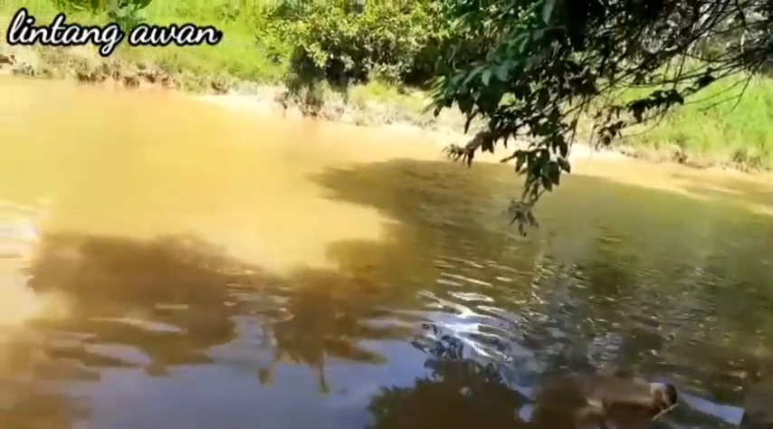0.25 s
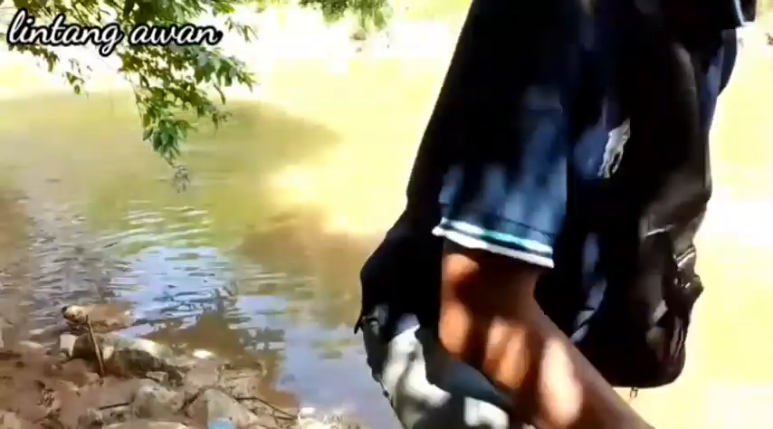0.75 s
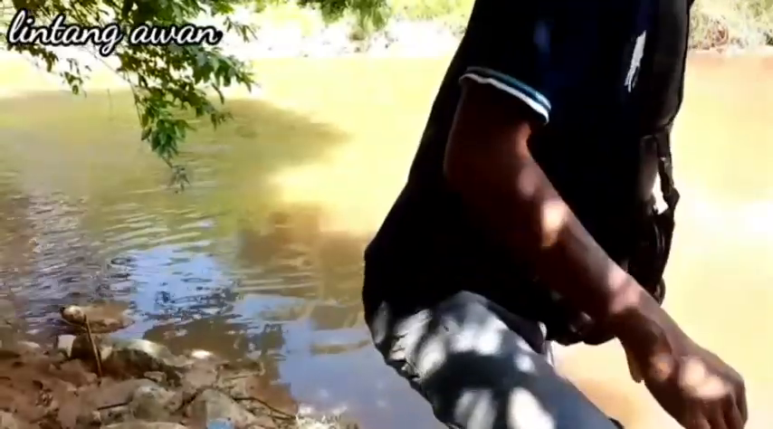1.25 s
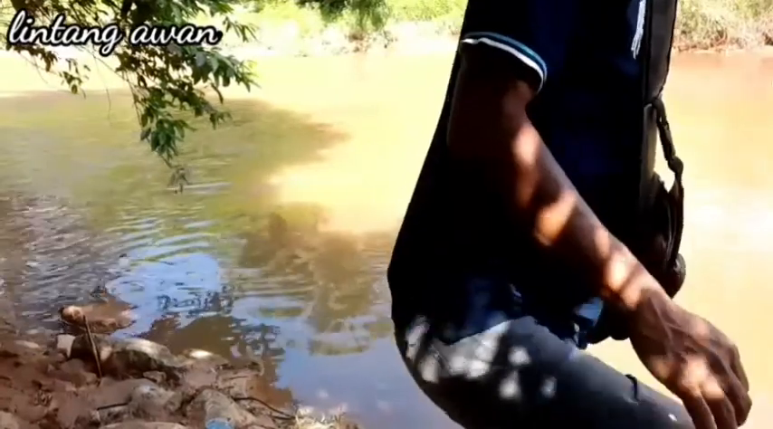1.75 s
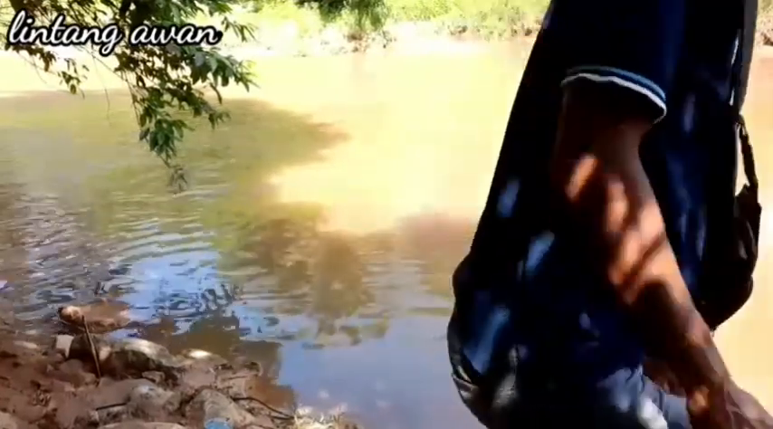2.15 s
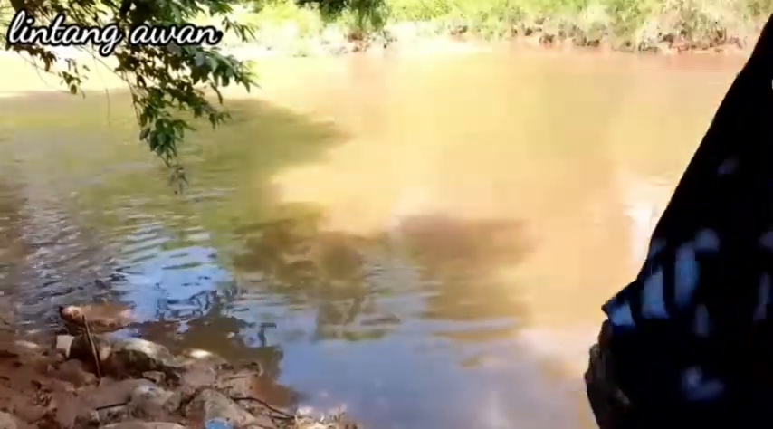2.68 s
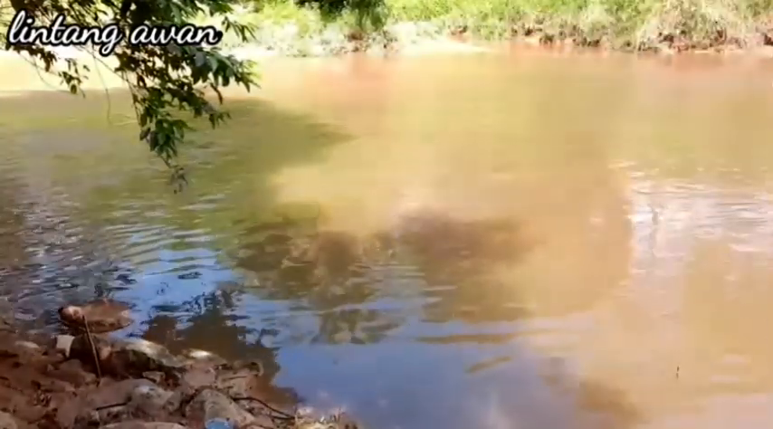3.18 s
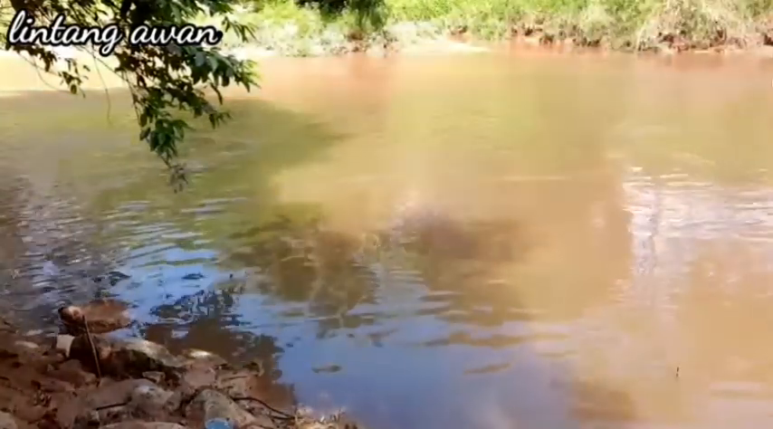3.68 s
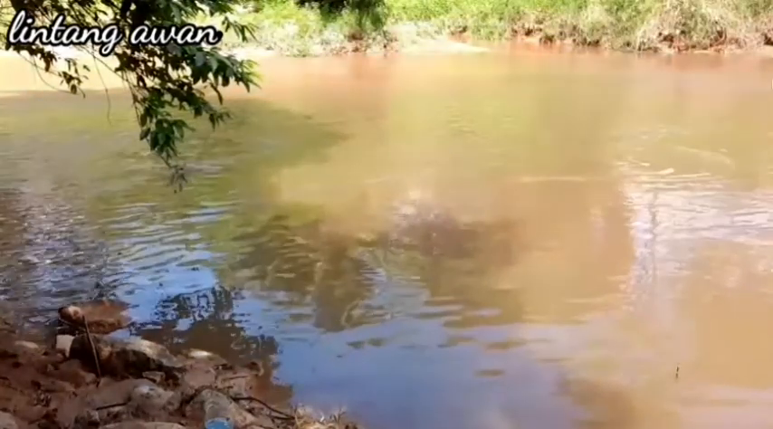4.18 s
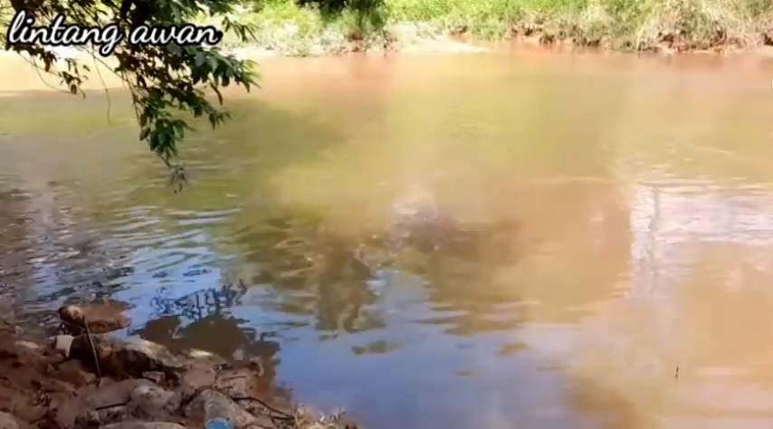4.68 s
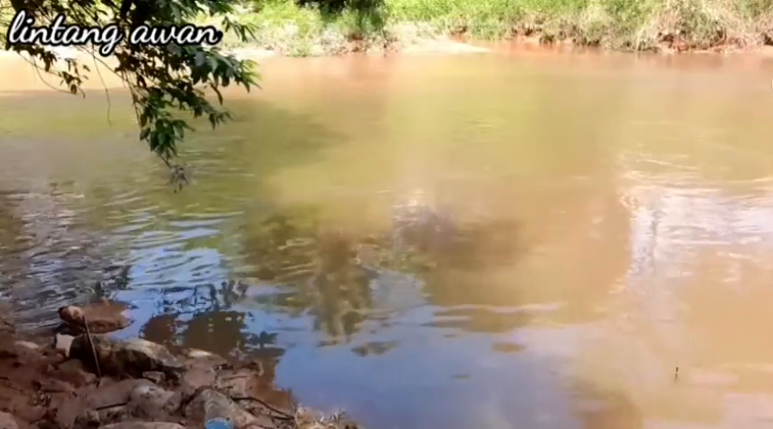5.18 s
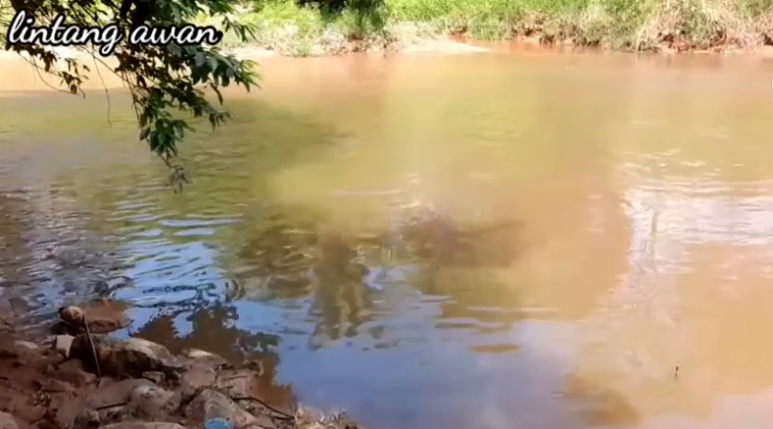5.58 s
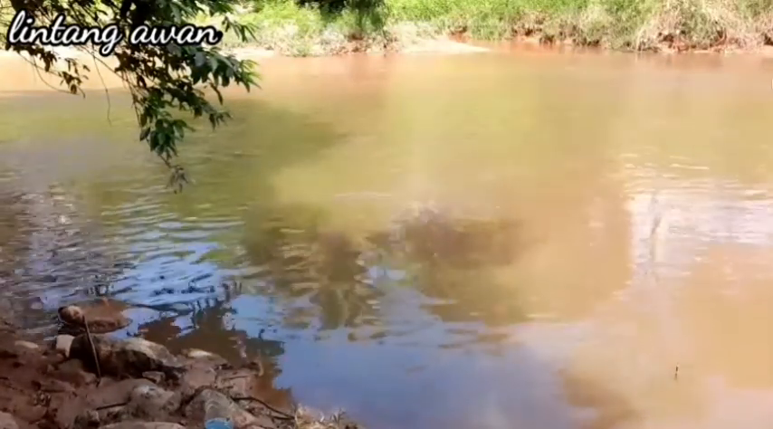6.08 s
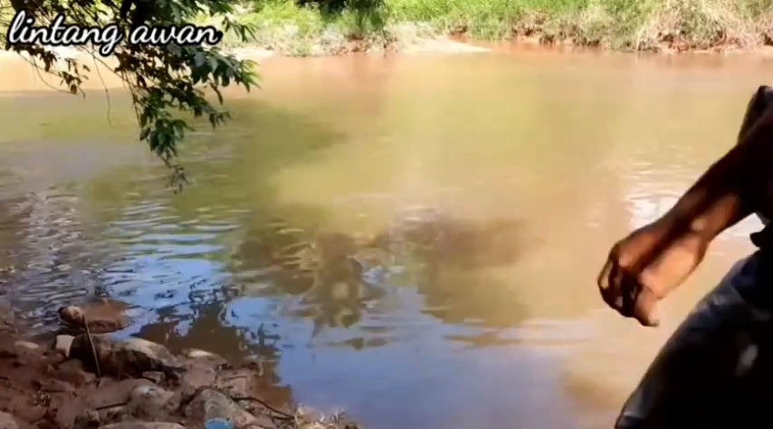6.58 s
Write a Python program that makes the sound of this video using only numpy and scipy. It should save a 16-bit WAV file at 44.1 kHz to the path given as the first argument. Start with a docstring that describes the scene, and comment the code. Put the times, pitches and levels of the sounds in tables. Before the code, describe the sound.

Complete silence until about 0.55 s, when a riverbank ambience opens at once. Very high crickets, near 9 kHz, chirp four to five times a second to the end, slipping in and out of step; the second swells around 2.5-3 s, drops back, then returns from about 4.8 s. Beneath lie a flickering far insect whine, soft low river rush, airy wash, hollow drone and faint hum. Close clothing swishes from 1 to 1.8 s. At 1.9 s a bird slurs steeply downward, then at 2.06 s stones knock dully with a grit crunch and low microphone bump. From 2.6 to 5.9 s a distant hoarse bird gives soft sliding calls, blurred by trees. Lighter knocks and crunches come at 3.3 and 5 s, with scattered rustles. A low buffet comes at 6.1 s, a knock at 6.35 s; falling bird notes at 6, 6.3 and 6.65 s lead to a last slur at 6.8 s.

```python
"""After a moment of silence a shaded river bank opens: three crickets chirp near 9 kHz, drifting in and out of
step, over far insects (flickering noise), a soft river and a low drone and hum. A man shifts about by the
microphone: his clothes rustle from the first second, then stones knock (dying rings) and grit crunches (lumpy noise).
Near two seconds a bird gives a falling slur, a sliding tone; from 2.6 s a far bird calls, blurred by trees.
Near the end the first bird gives short falling notes and one more slur."""
import sys
import numpy as np
from scipy import signal
from scipy.fft import rfft, irfft, next_fast_len
from scipy.io import wavfile
from scipy.ndimage import uniform_filter1d

SR = 44100
rng = np.random.default_rng(int(sys.argv[2]) if len(sys.argv) > 2 else 0)


def wav_record(signal):
    """Record a signal, one row per channel, as 16-bit PCM in the file named by sys.argv[1]."""
    frames = np.transpose(np.atleast_2d(signal))
    bounded = np.clip(frames, -1, 1)
    # unit amplitude maps onto the largest positive 16-bit level
    quanta = np.round(bounded * 32767).astype(np.int16)
    wavfile.write(sys.argv[1], SR, quanta)


N = 301776  # length in samples


def cricket(chirps, wing_hz, rise_hz, stroke_hz, swell_s, fade_s,
            soft=.15, stroke_s=.0135, sag_hz=110, scatter_hz=22, uneven_db=.9):
    """Each wing stroke rings a short tone; a chirp's soft strokes swell and climb in pitch, then stop short."""
    out = np.zeros(N)
    u = np.linspace(0, 1, round(stroke_s * SR))
    shape = np.sin(np.pi * u ** .65) ** 2
    for s, db in chirps:
        for k in np.arange(-9, 6):  # stroke 0 is the loudest
            slip, detune, force = rng.standard_normal(3)
            ahead = k / stroke_hz + 0.001 * slip
            if k < 0:
                swell = soft + (1 - soft) * np.exp(-(ahead / swell_s) ** 2)
            else:
                swell = np.exp(-(ahead / fade_s) ** 6)
            # the wing slows as it closes, so each tone sags
            hz = wing_hz + rise_hz * (swell - 1) + scatter_hz * detune - sag_hz * (u - .5)
            tone = np.sin(2 * np.pi * (np.cumsum(hz) / SR + rng.random()))
            size = 2 * amp(db + uneven_db * force) * swell * shape
            add(out, s + ahead - stroke_s / 2, size * tone)
    return out


def song(first_s, tempo, effort):
    """One chirp follows another at a drifting tempo; gives rows of loudest_s, level_db."""
    s, chirps = first_s, []
    while s < N / SR:
        chirps.append((s, np.interp(s, *np.transpose(effort))))
        s += np.interp(s, *np.transpose(tempo))
    return chirps


# when each cricket's first chirp is loudest
NEAR_FIRST_S, SECOND_FIRST_S, FAR_FIRST_S = .599, .722, .765
# the far cricket keeps an even beat and strength (level before the trees)
FAR_PERIOD_S, FAR_CRICKET_DB = .211, -53.5
# the nearer cricket's tempo: time_s, chirp_gap_s
NEAR_TEMPO = [(.6, .229), (1.05, .218), (1.6, .227), (2.3, .222), (3.4, .2375), (4.2, .228), (5.1, .228),
              (5.6, .24), (6.1, .218)]
# the second cricket's quicker tempo: time_s, chirp_gap_s
SECOND_TEMPO = [(.7, .2232), (1.4, .2079), (2.9, .204), (3.4, .2268), (4.1, .2028), (5.1, .1992),
                (6.3, .2074)]
# the nearer cricket sings evenly: time_s, level_db (before mixing)
NEAR_EFFORT = [(.6, -41.8), (2.6, -42), (3.7, -41.6), (4.7, -41.3), (5.8, -42), (6.4, -41.8)]
# the second swells twice with a lull between: time_s, level_db (before mixing)
SECOND_EFFORT = [(.7, -50), (1.3, -51), (2.1, -43.5), (2.6, -41), (3.05, -40.5), (3.3, -58), (4.1, -52),
                 (4.8, -42), (5.5, -39.8), (6.8, -40.5)]
# how the rasp of the wing's file spreads over pitch: pitch_hz, relative_level_db (per Hz)
RASP_SPECTRUM = [(7000, -25), (7800, -8), (8200, 4.5), (8600, 10.5), (8850, 10), (9100, 8), (9500, -7),
                 (10200, -27), (12000, -50)]


def crickets():
    """Three singers in the foliage, each at its own tempo; rasping noise follows the nearer two's strokes."""
    near = cricket(song(NEAR_FIRST_S, NEAR_TEMPO, NEAR_EFFORT),
                   wing_hz=8975, rise_hz=90, stroke_hz=66.5, swell_s=.06, fade_s=.046)
    second = cricket(song(SECOND_FIRST_S, SECOND_TEMPO, SECOND_EFFORT),
                     wing_hz=9050, rise_hz=120, stroke_hz=68.5, swell_s=.066, fade_s=.045)
    far_chirps = [(s, FAR_CRICKET_DB) for s in np.arange(FAR_FIRST_S, N / SR, FAR_PERIOD_S)]
    far = cricket(far_chirps, wing_hz=8650, rise_hz=50, stroke_hz=64, swell_s=.06, fade_s=.045)
    direct = amp(-.7) * place(near, left_db=10.5, lead_s=.000258)
    direct = direct + amp(-1.5) * place(second, left_db=-5, lead_s=.00012)
    # the outline of the two songs opens and closes the rasp
    scrape = np.hypot(abs(signal.hilbert(near)), 0.85 * abs(signal.hilbert(second)))
    scrape = uniform_filter1d(scrape, size=280)
    rasp = amp(-11) * scrape * diffuse(RASP_SPECTRUM, patchy_db=.5, left_db=0)
    scattered = trees(amp(-11) * (near + second) + far, t60=.16, gap_s=.002)
    return direct + rasp + scattered


# rubs of clothing: peak_s, length_s, crisp_swish_db, soft_brush_db (relative levels)
RUBS = [(1.098, 0.21, -51, -55), (1.425, 0.051, -53, -62), (1.525, 0.17, -46.3, -55.5),
        (1.71, 0.23, -49, -58.5), (2.073, 0.11, -54, -55), (3.283, 0.18, -58, -59.5),
        (3.375, 0.12, -51.5, -53.5), (3.93, 0.35, -56, -64.5), (4.242, 0.066, -50, -53),
        (4.3, 0.094, -58, -59), (4.976, 0.25, -55, -59), (5.294, 0.11, -57, -60), (5.638, 0.15, -57, -63),
        (5.8, 0.27, -71, -56), (6.075, 0.22, -64, -59), (6.434, 0.19, -58, -53.5), (6.58, 0.16, -53, -78),
        (6.717, 0.39, -59, -59.5)]
RUB_RISE = 0.59  # share of a rub spent swelling
SNAGS_PER_S, SNAG_S = 320, .0005  # average number of fibre snags, and how fast each dies away


def clothes():
    """Fibres catch and slip: a grainy swish swells and fades over a softer brushing and a gritty crackle."""
    s, length, swish_db, brush_db = np.transpose(RUBS)
    grain = amp(1.6 * wander(350) + .9 * wander(60))
    swish = diffuse([(1500, 6.5), (3500, -3), (6000, 3), (7500, 4.5), (10000, 3.0), (12500, 6.5), (15500, 2.0)],
                    patchy_db=3.7, left_db=-1.5)
    brush = diffuse([(100, -46), (400, 12.5), (1000, -1.5), (2000, 0.5), (4000, 2.5), (6000, -27.0),
                     (10000, -33)], patchy_db=1.5, left_db=-1.0)
    # snags at chance moments, each a sudden burst that dies away
    snags = (rng.random(N) < SNAGS_PER_S / SR) * rng.uniform(.2, 1, N) ** 2
    bursts = evened(signal.lfilter([1], [1, -np.exp(-1 / (SNAG_S * SR))], snags))
    grit = diffuse([(1000, -20), (2500, 0), (4200, 0), (6500, -3), (11000, -18)], patchy_db=2, left_db=-2.5)
    crackle = amp(-7) * bursts * grit
    crisp = swells(zip(s, length, swish_db), RUB_RISE) * grain * swish
    soft = swells(zip(s, length, brush_db), RUB_RISE) * (grain * brush + crackle)
    return crisp + soft


# stones knocking underfoot: start_s, peak_db (before placing), pitch_factor, ring_time_factor
KNOCKS = [(2.0557, -30, 1.22, 1.1), (2.0572, -36, 3.9, 1.1), (2.0637, -23, 0.743, 0.92),
          (2.0692, -22.5, 0.73, 1.5), (2.0714, -26, 1.71, 0.7), (2.086, -47, .3, 2.2), (3.233, -40, 0.9, 1),
          (3.279, -34, 1.14, 1.2), (3.316, -38, 1.14, 1), (5.06, -39, 1.45, 1.2),
          (6.3393, -27.5, 1.18, 0.7), (6.357, -37, 1.45, .9)]
# a stone's ring, damped by mud, before those factors: pitch_hz, relative_level_db, time_to_fall_60_db_s
STONE_RING = [(302, -33, 0.018), (420, 13, 0.02), (579, 2.5, 0.013), (1170, -9, 0.018)]
CONTACT_S = 0.0011  # how quickly a knock builds


def stones():
    """Short dull knocks of stones bedded in mud: a few tones that start together and die fast."""
    out, t = np.zeros(N), np.arange(SR // 10) / SR
    for s, db, higher, longer in KNOCKS:
        ring = sum(amp(level - 60 * t / (t60 * longer)) * np.sin(2 * np.pi * hz * higher * t)
                   for hz, level, t60 in STONE_RING)
        ring = ring * (1 - np.exp(-t / CONTACT_S))
        add(out, s, amp(db) * ring / abs(ring).max())
    return place(out, left_db=-4.5, lead_s=.0001) + amp(-14.5) * trees(out, t60=0.084, gap_s=0.004)


# shoes pressing into damp grit: peak_s, length_s, level_db (before placing)
STEPS = [(2.067, .02, -43), (3.235, .04, -54), (3.29, .1, -50.5), (4.92, .11, -51.5), (5.06, .06, -54),
         (6.35, .04, -50.5)]
STEP_RISE = 0.49  # share of a step spent pressing down


def steps():
    """Damp grit gives way under a shoe in a low, lumpy crunch of noise."""
    lumps = evened(amp(2.5 * wander(130)))
    grit = diffuse([(150, -20), (330, -3), (480, 0), (750, -5), (1150, -6.5), (1600, -18), (4000, -34)],
                   patchy_db=2, left_db=0)[0]
    return swells(STEPS, STEP_RISE) * lumps * place(evened(grit), left_db=-3, lead_s=.0001)


FLUTTER = .019  # typical quick waver of the bird's pitch, as a share of the pitch


def whistle(contour, notes):
    """Notes hang at the top, then slide down; quick flutter in pitch and strength makes them breathy."""
    out = np.zeros(N)
    at, pitch, level = np.transpose(contour)
    flutter = 1 + FLUTTER * wander(500)
    for s, db, higher, longer, hold, change_db in notes:
        # the hold delays the slide, but not the first rise in level
        knots = at * longer + hold * (np.arange(len(at)) > 1)
        t = np.arange(0, knots[-1], 1 / SR)
        hz = higher * np.interp(t, at * longer + hold, pitch)
        hz = hz * np.interp(s + t, np.arange(N) / SR, flutter)
        size = amp(db + np.interp(t, knots, level) + change_db * t / t[-1])
        add(out, s, size * np.sin(2 * np.pi * np.cumsum(hz) / SR))
    return out * amp(1.7 * wander(170))


# shape of the longer slur, which drops fast and then trails off: time_from_start_s, pitch_hz,
# relative_level_db (times and pitches before each slur's factors)
SLUR_SHAPE = [(0, 5700, -10), (.01, 5660, 1), (.021, 5620, 1), (.028, 4950, -3), (.038, 4330, 0),
              (.052, 4050, -7), (.07, 3780, 0), (.105, 3330, -8), (.14, 3100, -12)]
# the slurs: start_s, relative_level_db, pitch_factor, length_factor, top_hold_s, level_change_db
SLURS = [(1.905, -57, 1, 1, .001, -1), (6.798, -59, .965, 1, .008, 0)]
# shape of the short falling note, same columns as the slur's shape
NOTE_SHAPE = [(0, 4580, -17), (.009, 4520, 0), (.018, 4250, -2.5), (.026, 3750, -4), (.034, 3400, 0),
              (.046, 3080, -.5), (.058, 2800, 1.5), (.068, 2700, -14)]
# the short notes, same columns as the slurs
NOTES = [(5.984, -60, .94, .8, .001, 9), (6.311, -48, 1.0, .98, .002, 2), (6.651, -44, 1.0, .93, .004, 1)]
BANK_ECHO_S, BANK_ECHO_DB = .037, -16  # the bank throws the short notes back


def bird():
    """Short steep notes from the right, echoed by the bank, and longer slurs from deeper in the trees."""
    short, slurred = whistle(NOTE_SHAPE, NOTES), whistle(SLUR_SHAPE, SLURS)
    heard = amp(-2) * short + amp(-10) * slurred
    add(heard, BANK_ECHO_S, amp(BANK_ECHO_DB) * short)
    early = trees(amp(1) * short + amp(1.5) * slurred, t60=.14, gap_s=.001)
    late = trees(amp(-2.5) * short + amp(.5) * slurred, t60=0.35, gap_s=0.006)
    scattered = (early + late) * amp([[-1.5], [1.5]])  # stronger on the right
    return place(heard, left_db=-5, lead_s=.00002) + scattered


# the far bird's slurred calls: start_s, length_s, first_pitch_hz, last_pitch_hz, relative_level_db
FAR_CALLS = [(2.6, 0.2, 2200, 2050, -61), (2.905, 0.235, 1670, 1300, -51.5), (2.95, 0.16, 1980, 1760, -54),
             (3.478, 0.22, 1912, 1604, -53), (4.25, 0.17, 1970, 1728, -54), (4.806, .18, 1907, 1703, -58),
             (5.35, 0.18, 1890, 1714, -53.5), (5.92, 0.16, 1850, 1722, -51)]


def far_bird():
    """Sliding tones, made hoarse by quick chance changes of strength, from across the water through the trees."""
    out = np.zeros(N)
    for s, length, first_hz, last_hz, db in FAR_CALLS:
        hz = np.linspace(first_hz, last_hz, round(length * SR))
        call = np.hanning(len(hz)) ** .3 * np.sin(2 * np.pi * np.cumsum(hz) / SR)
        add(out, s, amp(db) * call)
    hoarse = out * (.75 + .6 * wander(120))
    direct = amp(-6.5) * place(hoarse, left_db=-1, lead_s=.00002)
    return direct + amp(-1.5) * trees(hoarse, t60=.25, gap_s=.004)


# how the far insects spread over pitch: pitch_hz, relative_level_db (per Hz)
CHORUS_SPECTRUM = [(5500, -36.5), (6500, -16.5), (7050, -8.5), (7700, -11.5), (8250, 0.5), (8650, 6),
                   (9000, 4.5), (9350, -3.5), (9800, -9), (10500, -27), (12500, -18.5), (15500, -17)]


def chorus():
    """Many far insects merge into a shimmering whine: high noise whose level flickers."""
    shimmer = amp(0.96 * wander(74) + 0.24 * wander(17.0))
    return amp(-48.3) * shimmer * diffuse(CHORUS_SPECTRUM, patchy_db=1.2, left_db=-0.5)


# how the river spreads over pitch: pitch_hz, relative_level_db (per Hz)
RIVER_SPECTRUM = [(25, -52), (34, -39), (48, -23), (62, -4.5), (85, -0.5), (115, 3), (150, -6.5), (188, -9),
                  (240, -3), (285, -4.5), (335, -8), (400, -7), (500, -12), (700, -22), (1500, -54)]
# how the open air spreads over pitch: pitch_hz, relative_level_db (per Hz)
AIR_SPECTRUM = [(350, -45), (600, -1), (737, 1.5), (797, 0), (1310, -5), (1630, 0), (2080, -2.5),
                (3420, -16), (4490, -14), (6200, -22.5), (8060, -12), (13600, -120)]
RIVER_DB, AIR_DB = -47, -54  # levels before the slow drift


def river():
    """The low rush of the current under a thin wash of open air: two noises that drift slightly in level."""
    surge, drift = amp(.6 * wander(2)), amp(.2 * wander(1.4))
    rush = amp(RIVER_DB) * surge * diffuse(RIVER_SPECTRUM, patchy_db=1.66, left_db=-3)
    wash = amp(AIR_DB) * drift * diffuse(AIR_SPECTRUM, patchy_db=1.96, left_db=-1.86)
    return rush + wash


# the far drone's rise and fall: time_s, level_db (before its waver)
DRONE_LEVEL = [(.6, -51.5), (1.3, -53.5), (2.5, -49.5), (2.9, -56), (3.6, -54), (4, -49.5), (4.4, -50),
               (5.1, -50.5), (5.8, -54.5), (6.8, -53.5)]
DRONE_HZ, DRONE_WIDTH_HZ = 338.6, 37.6  # middle pitch, and speed of the waver that blurs it


def drone():
    """A hollow drone from far off: a tone blurred by chance wavering in pitch and strength."""
    size = amp(np.interp(np.arange(N) / SR, *np.transpose(DRONE_LEVEL)))
    turn = np.exp(2j * np.pi * np.cumsum(DRONE_HZ + 9 * wander(3.067)) / SR)
    blur = wander(DRONE_WIDTH_HZ) + 1j * wander(DRONE_WIDTH_HZ)
    return place(size * (turn * blur).real, left_db=-5.0, lead_s=.0001)


# the far hum's rise and fall: time_s, level_db (before its waver)
HUM_LEVEL = [(.6, -61), (1.4, -58), (1.8, -52), (2.3, -51.5), (2.9, -54), (4.4, -66), (5.1, -47.5),
             (5.7, -64), (6.4, -49.5), (6.8, -55)]
# low buffets of air and handling on the microphone: peak_s, length_s, relative_level_db
BUFFETS = [(1.79, 0.7, -49), (2.076, 0.07, -38), (6.1, 0.14, -39.5), (6.4, 0.36, -49.5)]
BUFFET_RISE = 0.35  # share of a buffet spent swelling


def rumble():
    """A faint hum from afar, a low tone wavering in pitch and level, and soft low-noise buffets."""
    hum_db = np.interp(np.arange(N) / SR, *np.transpose(HUM_LEVEL)) + 2.5 * wander(6)
    hum = amp(hum_db) * np.sin(2 * np.pi * np.cumsum(65.5 + 2.2 * wander(5)) / SR)
    buffet = diffuse([(25, -34), (60, 1.0), (115, 6.0), (170, -10.5), (300, -22), (700, -65)],
                     patchy_db=5.5, left_db=-1.5)
    return place(hum, left_db=-3.5, lead_s=.0001) + buffet * swells(BUFFETS, BUFFET_RISE)


def trees(x, t60, gap_s):
    """Scatter from swaying leaves and trunks: dying tails that slowly trade places, different at each port."""
    t, out = np.arange(SR) / SR, np.zeros((2, N))
    for k in range(3):
        tail = rng.standard_normal((2, SR)) * amp(-60 * t / t60) * (1 - np.exp(-(t / gap_s) ** 2))
        share = np.cos(np.pi * (np.arange(N) / SR + k / 3)) * np.sqrt(2 / 3)
        out += signal.fftconvolve((x * share)[None], tail / np.linalg.norm(tail[0]), axes=1)[:, :N]
    return out


# how alike left and right are in sounds from all around: pitch_hz, likeness (1 same, 0 unrelated, -1 opposite)
LIKENESS = [(60, 0.99), (130, 0.94), (290, 0.71), (640, -0.21), (1300, -0.71), (2200, 0.62), (3200, -0.031),
            (7000, -0.014)]


def diffuse(spectrum, patchy_db, left_db):
    """Noise from all around with drifting patches; how alike the two ports are depends on pitch."""
    frames, hz = N // 512 + 5, np.fft.rfftfreq(2048, 1 / SR)
    a, b, c, d, patches = rng.standard_normal((5, frames, len(hz)))
    # smooth over time, then over pitch
    patches = evened(uniform_filter1d(uniform_filter1d(patches, size=9, axis=0), size=16, axis=1))
    same = np.clip(read(LIKENESS, hz), -.9, .99)
    z = np.array([a + 1j * b, (c + 1j * d) * np.sqrt((1 - same) / (1 + same))])
    z = z * amp(read(spectrum, hz) + patchy_db * patches)
    mid, side = signal.istft(z.swapaxes(1, 2), nperseg=2048, noverlap=1536)[1][:, :N]
    return np.array([(mid + side) * amp(left_db / 2), (mid - side) * amp(-left_db / 2)]) / np.std(mid)


def place(x, left_db, lead_s):
    """Two microphone ports: the left is louder by left_db and hears the source earlier by lead_s."""
    size = next_fast_len(N)
    delay = np.exp(-2j * np.pi * np.fft.rfftfreq(size, 1 / SR) * lead_s)
    late = irfft(rfft(x, size) * delay, size)[:N]
    return np.array([x * amp(left_db / 2), late * amp(-left_db / 2)])


def swells(pushes, rise):
    """Loudness of smooth pushes (peak_s, length_s, level_db); rise is the share of a length before its peak."""
    t = np.arange(0, N, 64) / SR
    size = sum(amp(db) * np.exp(-((t - s) / (length * np.where(t < s, rise, 1 - rise))) ** 2)
               for s, length, db in pushes)
    return np.interp(np.arange(N) / SR, t, size)


def wander(rate_hz):
    """Smooth chance movement of rms 1; a higher rate moves faster."""
    size = next_fast_len(N)
    hz = np.fft.rfftfreq(size, 1 / SR)
    return evened(irfft(rfft(rng.standard_normal(size)) * np.exp(-(hz / rate_hz) ** 2), size)[:N])


def amp(db):
    """Turns decibels into a factor on the wave."""
    return 10 ** (np.asarray(db) / 20)


def evened(x):
    """Scales to rms 1."""
    return x / np.sqrt(np.mean(x ** 2) + 1e-20)


def read(points, hz):
    """Joins the points of a spectrum on a log-frequency axis."""
    f, value = np.transpose(points)
    return np.interp(np.log(hz + 1), np.log(f + 1), value)


def add(mix, s, sound):
    """Mixes a sound in at time s."""
    part = mix[max(round(s * SR), 0):][:len(sound)]
    part += sound[:len(part)]


def scene():
    """All the sources on the bank sound together."""
    near = crickets() + clothes() + stones() + steps() + bird()
    return near + far_bird() + chorus() + river() + drone() + rumble()


START_S, EDGE_HZ = 0.553, 15650  # when the microphone opens, and the top of the treble


def record(dry):
    """Silence until the microphone opens over 5 ms; a filter then removes the highest treble."""
    opened = dry * np.clip((np.arange(N) / SR - START_S) / .005, 0, 1)
    lowpass = signal.firwin(511, EDGE_HZ, window=("kaiser", 9), fs=SR)
    return signal.oaconvolve(opened, lowpass[None], "same")


dry = scene()
out = record(dry)
wav_record(out)
```